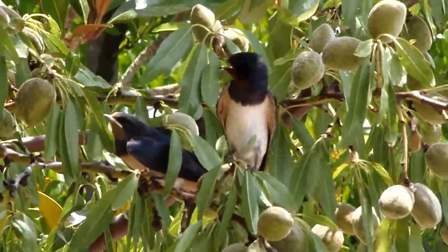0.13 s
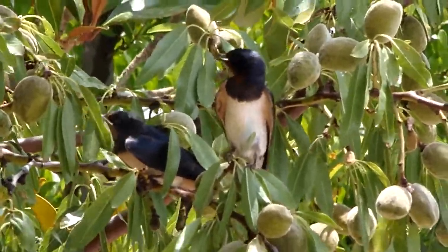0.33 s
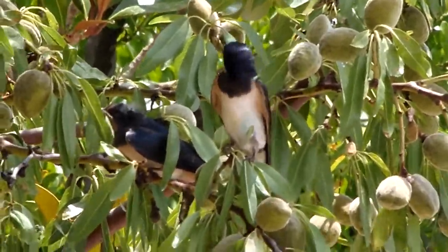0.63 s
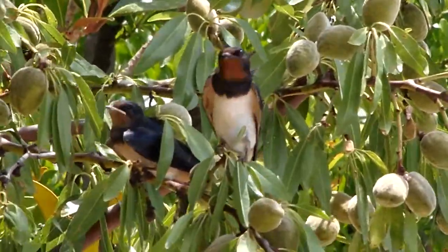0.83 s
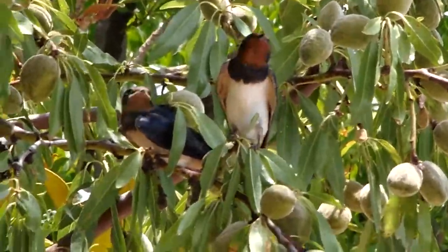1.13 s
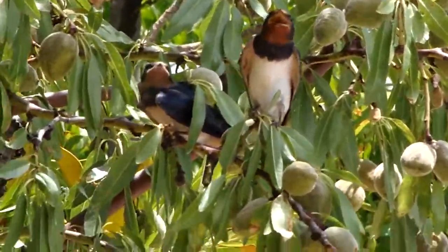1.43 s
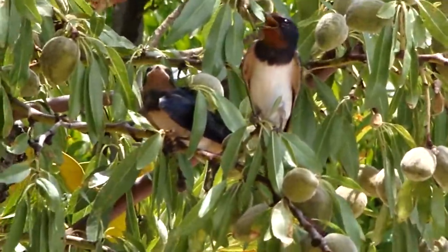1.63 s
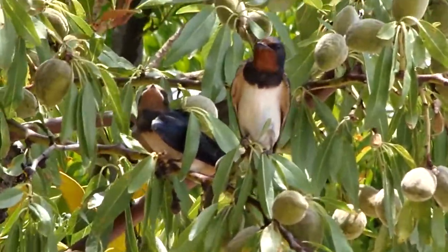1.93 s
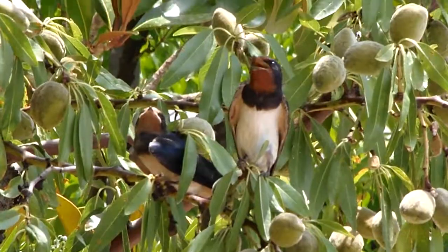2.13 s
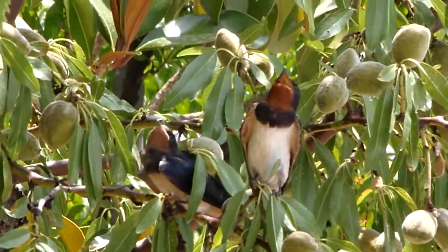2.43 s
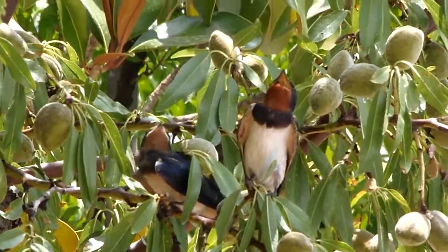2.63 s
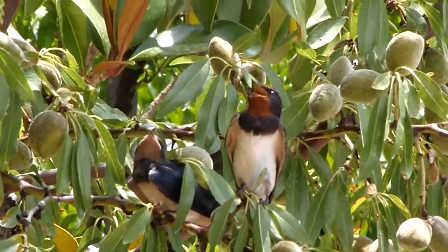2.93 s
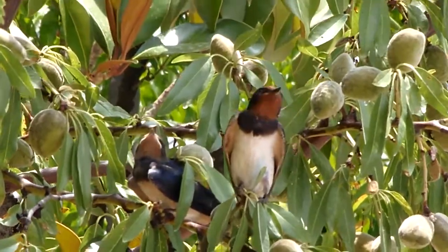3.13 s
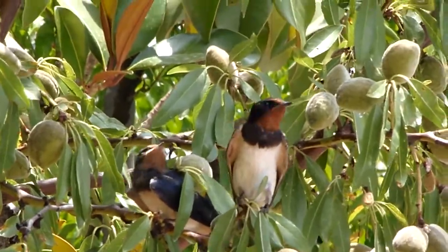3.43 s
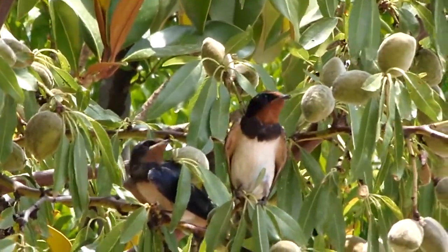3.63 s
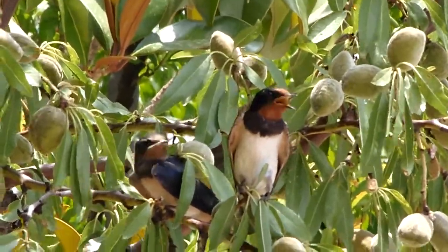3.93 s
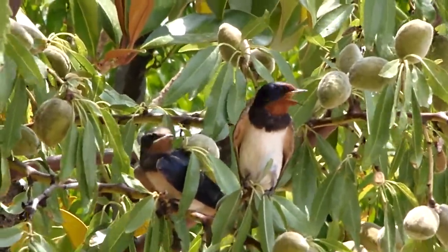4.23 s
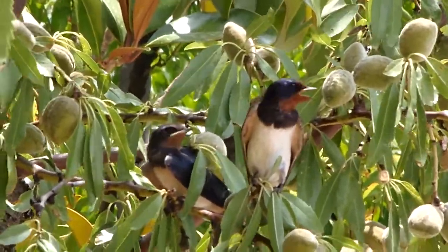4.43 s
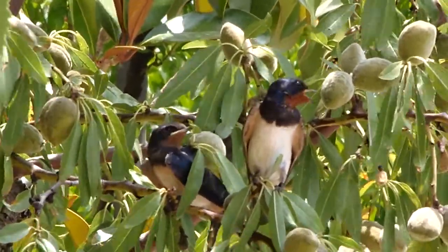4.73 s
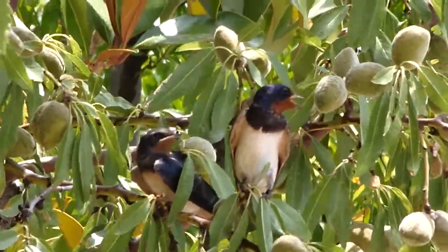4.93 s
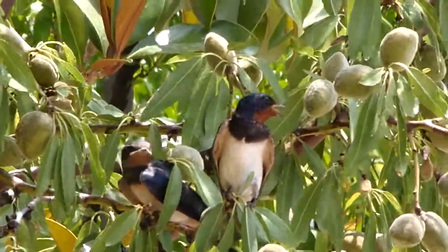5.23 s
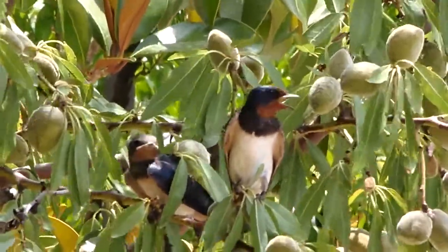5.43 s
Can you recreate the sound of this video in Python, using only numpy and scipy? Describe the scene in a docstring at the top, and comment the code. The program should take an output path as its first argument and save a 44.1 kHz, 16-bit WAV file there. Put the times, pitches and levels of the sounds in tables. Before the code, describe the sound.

Swallows twitter with buzzy chirps and a wheeze in a breezy tree, with wind thumps on the microphone and a few dry clicks.

```python
"""Swallows in a breezy tree

Two swallows twitter some way off: buzzy chirps, quick slurs, thin whistles and one long wheeze,
all made by the syrinx, a bird's voice box. A few dry clicks snap nearer by. Wind thumps on the
microphone at first, makes the camera turn itself down, then settles to a faint rumble under leaves."""
import sys
import numpy as np
from scipy import signal
from scipy.fft import rfft, irfft, next_fast_len
from scipy.io import wavfile
from scipy.ndimage import uniform_filter1d, minimum_filter1d, map_coordinates

SR = 44100
rng = np.random.default_rng(int(sys.argv[2]) if len(sys.argv) > 2 else 0)


def wav_out(sig):
    """Save sig, one row per channel (or a flat mono array), as 16-bit PCM at SR to the path in sys.argv[1]."""
    wavfile.write(sys.argv[1], SR, np.round(np.clip(np.atleast_2d(sig).T, -1, 1) * 32767).astype(np.int16))


N = 246519


def note(length, hz, glide_oct, rough, rasp_hz=580, rasp_rate=900, overtone_db=-23):
    """One whistle sliding through its pitch; a fast flutter of the syrinx roughens it."""
    size = max(int(length * SR), 64)
    progress = np.linspace(0, 1, size)
    pitch = hz * 2 ** (glide_oct * (progress - .5)) + rough * rasp_hz * wobble(rasp_rate, size)
    phase = 2 * np.pi * np.cumsum(pitch) / SR
    swell = np.sqrt(np.abs(np.sin(np.pi * progress))) * amp(10 * rough * wobble(270, size))
    return unit(swell * (np.sin(phase) + amp(overtone_db) * np.sin(2 * phase)))


# Buzzy chirps, the main syllable.
# Each row: start in seconds, length in seconds, pitch in Hz, relative level in dB, roughness 0 to 1.
BUZZES = [(.128, 0.058, 4450, -43, 0.42), (.259, 0.066, 4650, -47.5, 1), (0.59, 0.054, 4730, -45, 0.32),
          (0.691, 0.042, 4720, -47, .2), (1.33, 0.064, 4200, -46, 0.28), (2.106, 0.054, 4300, -39.5, 0.4),
          (2.741, 0.024, 4160, -45, .5), (2.794, .065, 4450, -40, 0.53), (3.326, 0.1, 4120, -49.5, 0.35),
          (3.49, 0.054, 3790, -49, 0.22), (3.738, .07, 4110, -48.5, 0.56), (3.963, .07, 4340, -42.5, 0.44),
          (4.326, .05, 3830, -47.5, 0.8), (4.391, 0.044, 4100, -46.5, .55),
          (5.001, 0.033, 3916, -39.5, 0.35), (5.042, 0.047, 3700, -48.5, .85)]
# Quick falling notes. Each row: start in seconds, pitch in Hz, relative level in dB.
FALLING_NOTES = [(.645, 3970, -45), (1.976, 3320, -46), (2.19, 3220, -43.5), (2.419, 3220, -47),
                 (2.633, 3200, -44.5), (2.861, 3170, -40.5), (2.979, 3700, -47.5), (4.288, 3880, -44.5),
                 (4.929, 4050, -43.5)]
# Quick rising notes. Each row: start in seconds, pitch in Hz, relative level in dB.
RISING_NOTES = [(.685, 3680, -47), (1.854, 3700, -37.5), (2.341, 4430, -47), (2.475, 4430, -47),
                (3.018, 4480, -47.5)]
# Thin whistles. Each row: start in seconds, length in seconds, pitch in Hz, relative level in dB.
WHISTLES = [(3.38, 0.037, 3190, -48), (3.637, 0.016, 3160, -49), (4.257, .04, 6250, -57),
            (4.421, .077, 7080, -56), (4.715, .041, 6410, -57), (4.808, .044, 7400, -55),
            (4.87, 0.11, 6620, -56)]
# The tones of one nasal squeak. Each row: multiple of the base pitch, relative level in dB.
SQUEAK_TONES = [(3, -43.5), (5, -43.5), (6, -47.5)]

def twitter(slur_s=0.0259, squeak_at_s=1.815, squeak_s=0.026, squeak_hz=1004):
    """The swallows sing a few kinds of syllable, each with its own slide in pitch."""
    song = np.zeros(N)
    for start, length, hz, db, rough in BUZZES:
        add(song, start, amp(db) * note(length, hz, glide_oct=-.13, rough=rough))
    for rows, glide_oct in (FALLING_NOTES, -.29), (RISING_NOTES, .294):
        for start, hz, db in rows:
            add(song, start, amp(db) * note(slur_s, hz, glide_oct, rough=.22))
    for start, length, hz, db in WHISTLES:
        add(song, start, amp(db) * note(length, hz, glide_oct=0, rough=.15))
    for multiple, db in SQUEAK_TONES:
        add(song, squeak_at_s, amp(db) * note(squeak_s, multiple * squeak_hz, glide_oct=0, rough=.15))
    return song


# Where the bird's throat rings. Each row: centre in Hz, width in Hz, relative level in dB.
THROAT = [(3750, 830, 6), (4480, 390, 5.5), (4960, 1200, 4)]

def wheeze(start_s=1.295, end_s=1.94, rise_s=0.041, fall_s=0.098, sag_db_per_s=10, pulse_hz=172):
    """A hoarse hiss, pulsed by the syrinx and shaped by the throat, that weakens as it is held."""
    t = np.arange(N) / SR
    swell = np.clip(np.minimum((t - start_s) / rise_s, (end_s - t) / fall_s), 0, 1)
    level = swell * amp(-43.5 - sag_db_per_s * (t - start_s))
    pulse_rate = pulse_hz * (1 + .15 * wobble(30))
    pulses = 1 + 0.45 * np.sin(2 * np.pi * np.cumsum(pulse_rate) / SR)
    throat = lambda f: sum(amp(db) / (1 + (2 * (f - hz) / width) ** 4) for hz, width, db in THROAT)
    return level * unit(filtered(pulses * rng.standard_normal(N), throat))


# Dry clicks. Each row: start in seconds, level in dB, ringing pitch in Hz,
# then the crack and its scatter, both in dB compared with that level.
CLICKS = [(2.786, -32, 3400, -7, -10), (2.8965, -17.5, 1420, -8.5, -19.5), (2.905, -32.5, 7600, 0.5, -6),
          (3.3508, -36.5, 4000, -4, -13), (3.449, -31.5, 1310, 2.5, -0.5), (3.959, -30.5, 2650, -17, -17),
          (4.6155, -31.5, 875, 3.5, 1), (5.056, -37, 2450, -14, -11), (5.147, -28, 2370, -12, -16.5)]
# The tone of a crack. Each row: frequency in Hz, relative level in dB.
CRACK_TONE = [(150, -5), (600, -2.5), (1500, -2), (2500, -3), (4500, -2.5), (6800, -1.5), (9000, -8.5),
              (12000, -10.5), (15500, -17)]

def clicks(ring_t60=0.0062, crack_t60=0.022, scatter_t60=0.12):
    """A snap rings briefly, then scatters off leaves and branches. A t60 is seconds to fade by 60 dB."""
    track, t = np.zeros(N), np.arange(SR // 4) / SR
    for start, db, hz, crack_db, scatter_db in CLICKS:
        ring = 2 * np.sin(2 * np.pi * hz * t) * amp(-60 * t / ring_t60) * (1 - np.exp(-t / 0.00017))
        crack = amp(crack_db - 60 * t / crack_t60) * noise(CRACK_TONE, len(t))
        scatter_level = amp(scatter_db - 60 * t / scatter_t60) * (1 - np.exp(-t / 0.00047))
        scatter = scatter_level * noise(CRACK_TONE, len(t))
        add(track, start, amp(db) * (ring + crack + scatter))
    return track


# Wind thumps. Each row: middle in seconds, level in dB, pitch in Hz, length of its wake in seconds.
THUMPS = [(0.054, -25.5, 70, 0), (0.236, -18.5, 95, 0), (0.2936, -6, 306.6, .036), (.525, -15.5, 131, .072),
          (0.758, -24, 50, 0), (.848, -32, 157, 0), (.986, -25, 115, .024), (1.05, -22.5, 65, 0),
          (1.339, -26, 176, .036)]
# The tone of the churning air in a thump. Each row: frequency in Hz, relative level in dB.
CHURN_TONE = [(40, 4), (200, -5.5), (380, -8.5), (550, -17), (1000, -23), (1600, -37), (5000, -76)]

def thumps(churn_db=-12, half_s=0.0034, gap_s=.012, wake_db=-2.5, fade_db_per_s=112, wake_hz=155):
    """Swirls of air (eddies) strike the microphone; some trail a wake of weaker, uneven ones."""
    t, track = np.arange(N) / SR, np.zeros(N)
    churn = amp(churn_db) * noise(CHURN_TONE)
    eddy = lambda at, hz: bump(at, half_s) * (np.sin(2 * np.pi * hz * (at - t)) + churn)
    for middle, db, hz, wake_s in THUMPS:
        track += amp(db) * eddy(middle, hz)
        for k in range(round(wake_s / gap_s)):
            late, detune = rng.uniform(-1, 1, size=2)
            delay = gap_s * (k + 1 + 0.23 * late)
            pitch = wake_hz * 2 ** (.6 * detune)
            track += amp(db + wake_db - fade_db_per_s * delay) * eddy(middle + delay, pitch)
    return track


# The tone of wind on the microphone. Each row: frequency in Hz, relative level in dB.
RUMBLE_TONE = [(12, -9.5), (25, 6), (55, 4), (110, -7), (200, -21), (350, -27.5), (700, -42), (2000, -90)]

def wind_rumble(gust_db=-36, gust_end_s=1.45, drop_s=.08, lull_db=-42, fade_db_per_s=6, calm_db=-54):
    """A gust buffets the microphone, drops quickly, then dies down to a calm."""
    since_gust = np.arange(N) / SR - gust_end_s
    fading_db = np.maximum(lull_db - fade_db_per_s * since_gust, calm_db)
    level_db = gust_db + (fading_db - gust_db) * np.clip(since_gust / drop_s, 0, 1)
    return amp(level_db + 1.06 * wobble(24)) * noise(RUMBLE_TONE)


# The breeze in the tree. Each row: time in seconds, relative levels of air rush and leaf hiss in dB.
BREEZE = [(0.88, -49, -56), (1.06, -47, -55.5), (1.42, -45, -54.5), (1.89, -46.5, -56),
          (2.22, -44.5, -57.5), (2.78, -46, -58), (2.95, -48.5, -58.5), (3.74, -49.5, -62),
          (4.37, -49.5, -61.5), (5.59, -48.5, -60)]
# The tones of the rush and of the hiss. Each row: frequency in Hz, relative level in dB.
RUSH_TONE = [(40, -15.5), (130, -5.5), (300, 0.5), (550, 0.5), (1000, -2.5), (1600, -6), (2400, -8),
             (3200, -8), (4500, -10), (6500, -17.5), (8500, -21), (16000, -58)]
HISS_TONE = [(800, -5), (2300, -3.5), (3200, -0.5), (4500, 0), (6000, -1), (7200, -2.5), (9000, -5.5),
             (12000, -8), (15500, -11.5)]

def breeze():
    """Air rushes through the tree and makes its leaves hiss."""
    rush_db, hiss_db = curves(BREEZE)
    rush = amp(rush_db + 2) * patchy(noise(RUSH_TONE), depth_db=0.56)
    hiss = amp(hiss_db + 8) * patchy(noise(HISS_TONE), depth_db=1.3)
    return rush + hiss


# Brief rustles. Each row: middle in seconds, level in dB, half length in seconds.
RUSTLES = [(1.287, -46, .015), (2.115, -47.5, 0.027), (2.36, -45.5, .015), (2.767, -48, 0.031),
           (3.276, -46.5, 0.0065), (3.889, -50.5, .0083), (3.956, -46.5, 0.041), (5.545, -49.5, 0.02)]
# The tone of a rustle. Each row: frequency in Hz, relative level in dB.
LEAF_TONE = [(1500, -2), (4000, 1.5), (7000, -4.5), (10000, -7), (15500, -12.5)]

def rustles():
    """Leaves brush together in short grainy swishes."""
    strokes = sum(amp(db) * bump(middle, half_s) for middle, db, half_s in RUSTLES)
    return strokes * unit(noise(LEAF_TONE) * amp(2.1 * wobble(600)))


# The tone of the far-off rumble. Each row: frequency in Hz, relative level in dB.
DRONE_TONE = [(25, -5.5), (60, 0.5), (85, 3), (140, -2), (220, -5), (400, -17), (1200, -47)]

def distant_drone(level_db=-48.5, swell_db=3.5):
    """A low, far-off outdoor rumble that swells once."""
    return amp(level_db + swell_db * bump(middle_s=3.72, half_s=0.45)) * noise(DRONE_TONE)


def tree_echo(x, t60):
    """The trees around send back a short, blurred echo."""
    t = np.arange(SR // 2) / SR
    tail = rng.standard_normal(len(t)) * amp(-60 * t / t60) * (1 - np.exp(-t / 0.0061))
    return signal.fftconvolve(x, tail / np.linalg.norm(tail))[:N]


def gain_control(x, limit_db=-8.5, duck_s=0.048, hold_s=0.12, recover_db_per_s=17.5):
    """A peak over the limit turns the volume down; it stays there a moment, then creeps back up."""
    excess_db = np.maximum(20 * np.log10(np.abs(x).max(axis=0) + 1e-9) - limit_db, 0)
    hold = round(hold_s * SR)
    held_db = -minimum_filter1d(-excess_db, size=hold, origin=(hold - 1) // 2)
    recovery_db = recover_db_per_s * np.arange(N) / SR
    cut_db = np.maximum.accumulate(held_db + recovery_db) - recovery_db
    lag = np.exp(-1 / (duck_s * SR))
    return x * amp(-signal.lfilter([1 - lag], [1, -lag], cut_db))


def amp(db):
    """Turn decibels into a multiplier."""
    return 10 ** (np.asarray(db) / 20)


def unit(x):
    """Scale a sound to an average strength (rms) of 1."""
    return x / np.sqrt(np.mean(x ** 2) + 1e-20)


def bump(middle_s, half_s):
    """A bell-shaped rise to 1 and back."""
    return np.exp(-((np.arange(N) / SR - middle_s) / half_s) ** 2 / 2)


def curves(rows):
    """Join timed rows with straight lines, one curve for each column after the time."""
    times, *columns = np.transpose(rows)
    return [np.interp(np.arange(N) / SR, times, column) for column in columns]


def wobble(rate, size=N):
    """A smooth curve through `rate` random points a second."""
    points = rng.standard_normal(int(size * rate / SR) + 4)
    return map_coordinates(points, [np.arange(size) * rate / SR])


def filtered(x, response):
    """Multiply each frequency in a sound by response(hz)."""
    size = x.shape[-1]
    padded = next_fast_len(size + 8192)
    return irfft(rfft(x, padded) * response(np.fft.rfftfreq(padded, 1 / SR)), padded)[..., :size]


def noise(tone, size=N):
    """Noise of strength 1, shaped by a tone table."""
    freqs, db = np.transpose(tone)
    response = lambda hz: amp(np.interp(np.log(hz + 1), np.log(freqs), db))
    return unit(filtered(rng.standard_normal(size), response))


def patchy(x, depth_db):
    """Let patches of low and high sound swell and fade on their own."""
    spectra = signal.stft(x, nperseg=512)[2]
    patches = uniform_filter1d(rng.standard_normal(spectra.shape), size=6, axis=0)
    patches = uniform_filter1d(patches, size=12, axis=1)
    return unit(signal.istft(spectra * amp(depth_db * unit(patches)), nperseg=512)[1][:N])


def add(track, start_s, sound):
    """Mix a sound into the track at its start time."""
    start = max(round(start_s * SR), 0)
    track[start:start + len(sound)] += sound[:len(track) - start]


def scene():
    """Everything lies straight ahead; only the bright echo of the clicks spreads sideways."""
    song = twitter() + wheeze()
    birds = amp(-4) * song + amp(-6) * tree_echo(song, t60=0.41)
    snaps = clicks()
    background = thumps() + wind_rumble() + breeze() + distant_drone() + rustles()
    mid = birds + snaps + background
    side = amp(-49) * filtered(tree_echo(snaps, t60=0.1), lambda hz: hz > 4100)
    return np.array([mid + side, mid - side])


def record(dry):
    """The camera turns down after a loud peak, and loses a narrow treble band and the very top."""
    notch_hz, top_hz = 7830, 15830
    notch = lambda hz: np.abs(hz - notch_hz) / np.hypot(hz - notch_hz, 280)
    return filtered(gain_control(dry), lambda hz: notch(hz) * (hz < top_hz))


dry = scene()
out = record(dry)
wav_out(out)
```